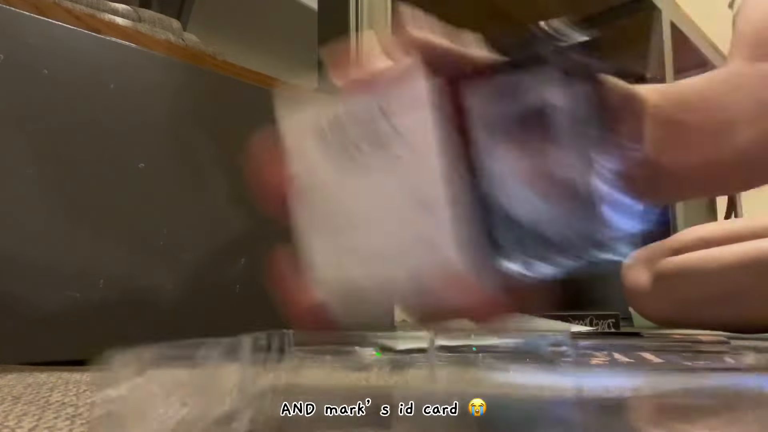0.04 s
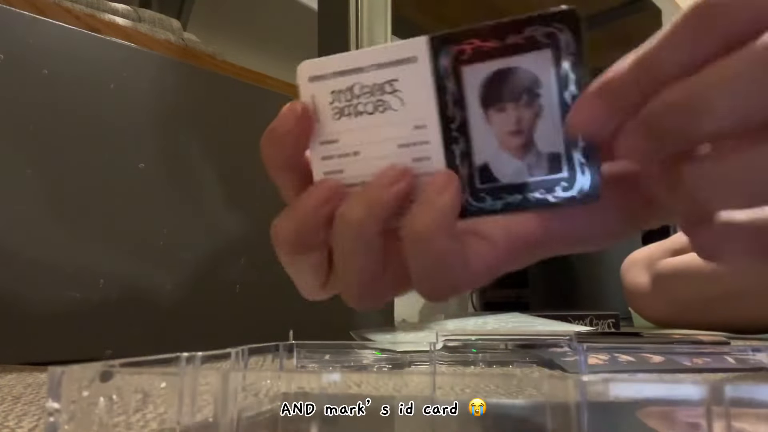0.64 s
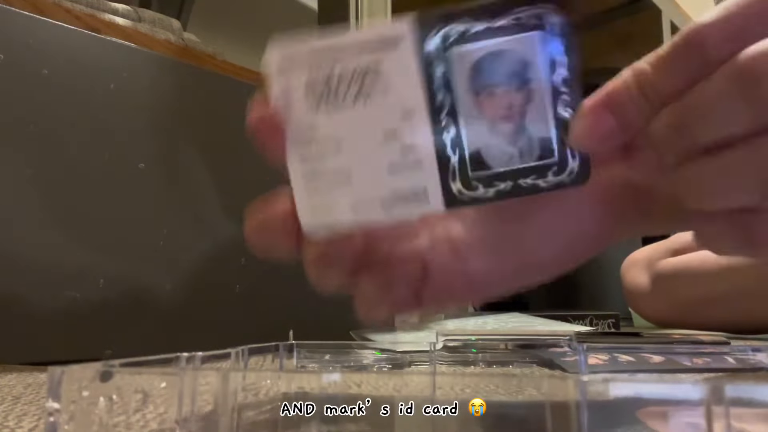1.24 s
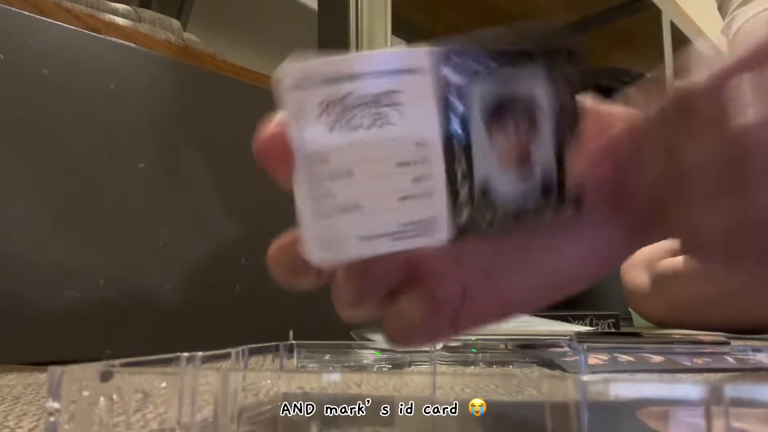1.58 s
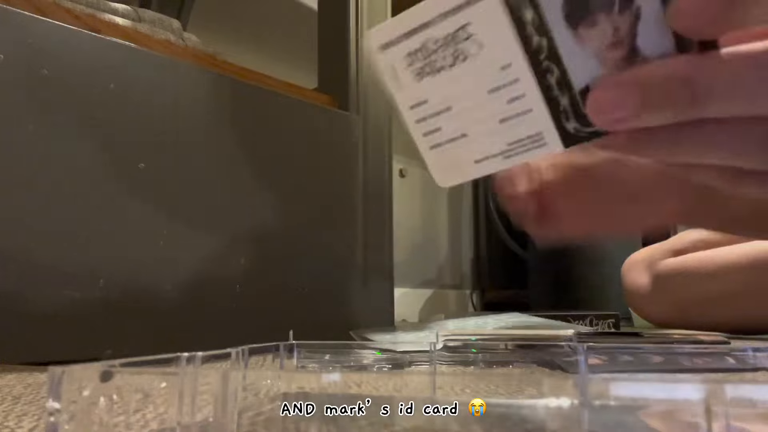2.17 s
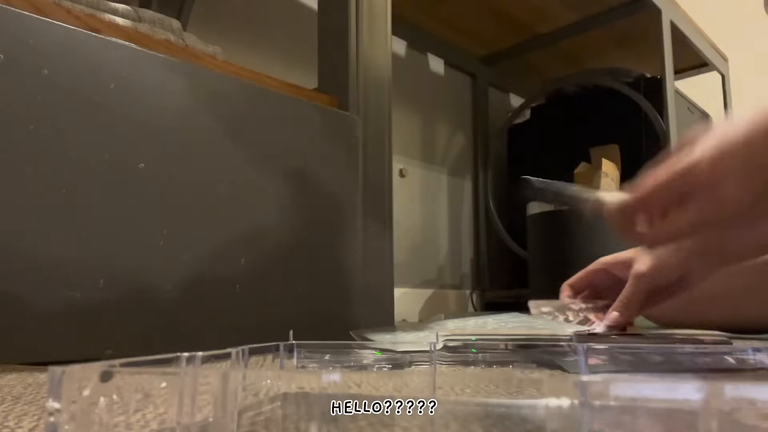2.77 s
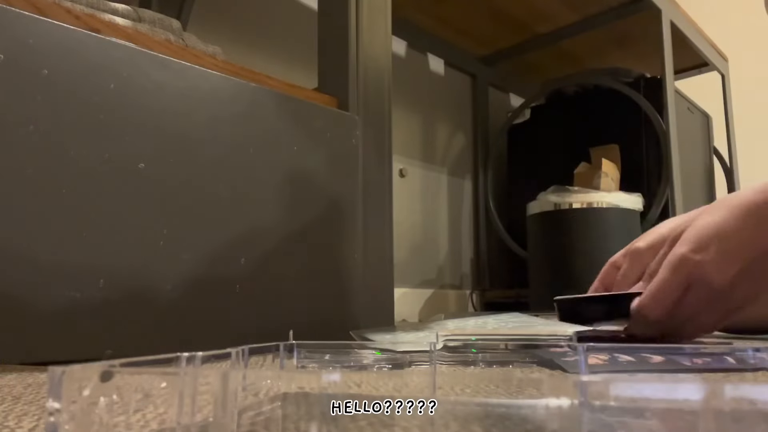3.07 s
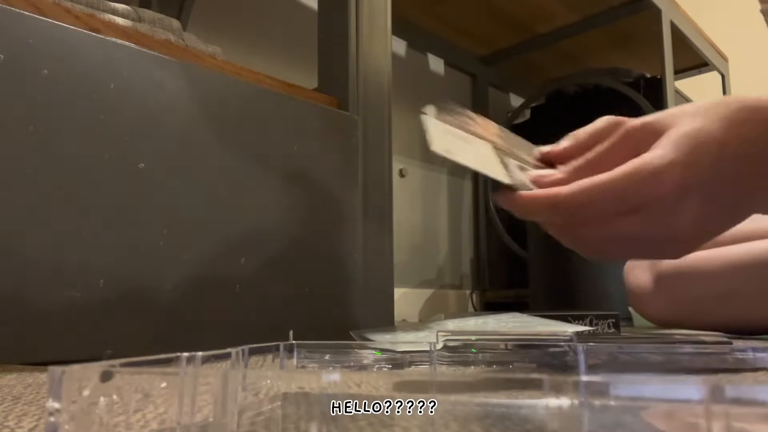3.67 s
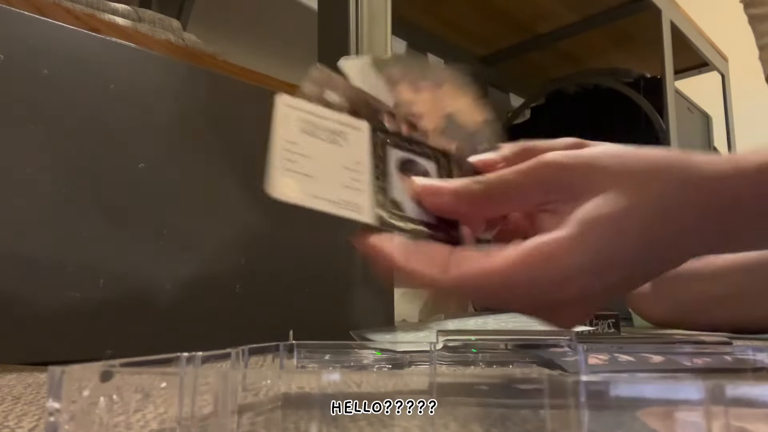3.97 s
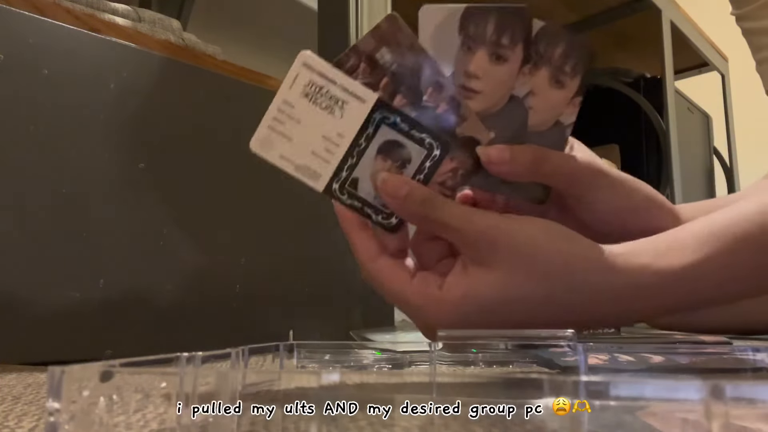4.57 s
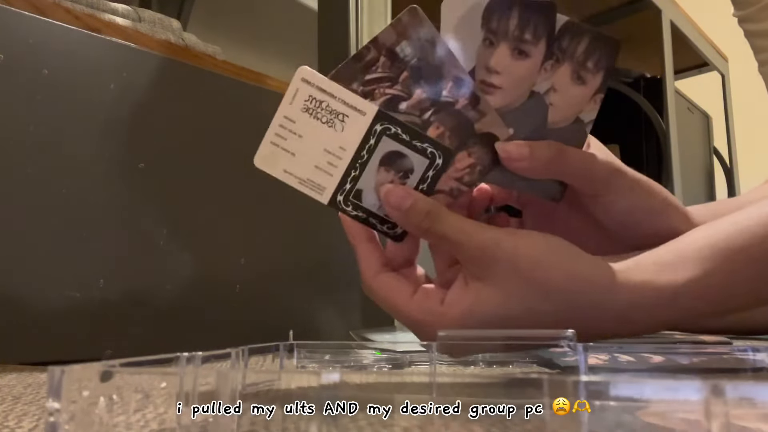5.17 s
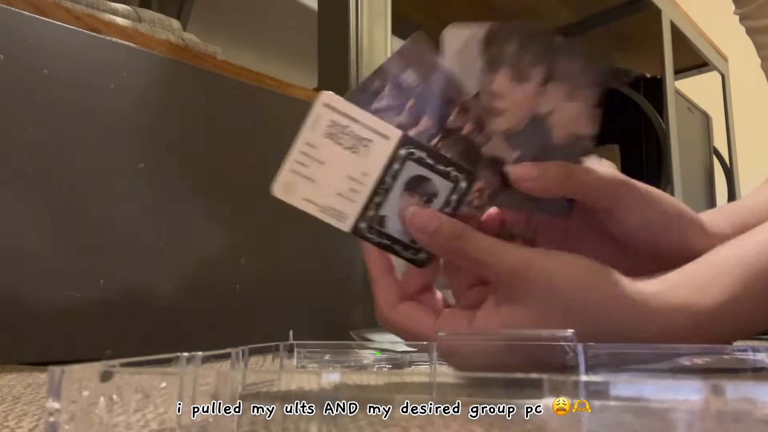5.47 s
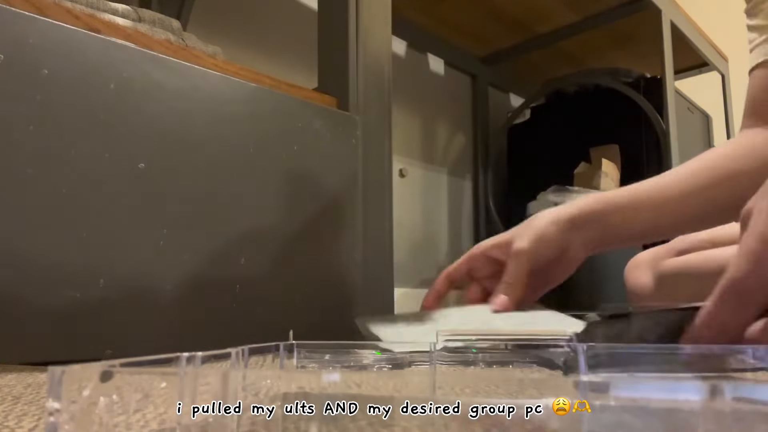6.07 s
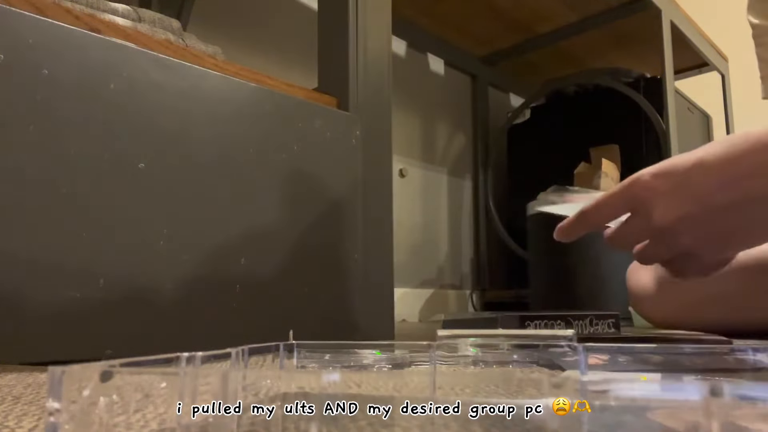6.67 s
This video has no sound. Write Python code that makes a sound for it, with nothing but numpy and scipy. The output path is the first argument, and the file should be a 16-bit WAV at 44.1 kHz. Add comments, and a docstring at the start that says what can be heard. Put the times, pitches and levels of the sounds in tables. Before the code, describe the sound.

In a small, dry room, hands handle stiff cards near the microphone. It opens with a loud rattling scrape and two springy snaps, then a soft bump and a couple of clicks. Quiet rubbing and swishing of card over card follows, dotted with small taps and broken by one sharp snap past the middle. More sliding and light ticks close it, over a faint low hum.

```python
"""A stiff card scrapes and snaps over the fingers and flexes twice, close by in a small carpeted room.
Later, skin and card slide in short hissing strokes with light taps; cards are picked off a pile, fanned
with one sharp snap and put down. Each snap is an impulse that excites the modes of the cards, each flex
a dispersive bending wave; sliding friction gives the hiss and damped resonances give the taps.
An appliance hums behind."""
import sys
import numpy as np
from scipy import signal
from scipy.fft import rfft, irfft, next_fast_len
from scipy.io import wavfile
from scipy.ndimage import uniform_filter1d

SR = 44100
rng = np.random.default_rng(int(sys.argv[2]) if len(sys.argv) > 2 else 0)


def store_wav(level_fs):
    """Save 16-bit WAV to argv[1]."""
    pcm = np.round(np.clip(np.atleast_2d(level_fs), -1, 1) * 32767)
    wavfile.write(sys.argv[1], SR, pcm.T.astype(np.int16))


N = 301644
TIME = np.arange(N) / SR

# stereo width by frequency, the highest treble drawn to the centre: (frequency [Hz], correlation [-1..1])
NEAR_STEREO = [(200, 0.45), (640, 0), (1400, 0.2), (3100, 0.1), (7000, -0.1), (11000, 0), (14000, 0.7)]
# the same, but wider around 3 kHz: (frequency [Hz], correlation [-1..1])
SNAP_STEREO = [(200, 0.4), (700, 0.3), (1500, 0.2), (3000, -0.3), (5000, -0.05), (11000, 0), (14000, 0.7)]


def from_db(db):
    """Amplitude ratio of a level in decibels."""
    return np.exp(np.asarray(db) * np.log(10) / 20)


def unit_rms(x):
    """Normalisation to unit mean power."""
    return x / np.sqrt(np.mean(x ** 2) + 1e-20)


def at_hz(points, hz):
    """Interpolation on a logarithmic frequency axis."""
    f, value = np.transpose(points)
    return np.interp(np.log(np.maximum(hz, 1)), np.log(f), value)


def decay(t, t60):
    """Exponential damping, 60 dB down at t60."""
    return np.exp(-np.log(1000) * t / t60)


def add(out, s, sound):
    """Superposition of a short sound from time s on."""
    start = max(round(s * SR), 0)
    out[:, start:start + sound.shape[-1]] += sound[..., :N - start]


def panned(db):
    """Direction by level difference: a pair of gains, left over right."""
    return from_db(np.array([[db], [-db]]) / 2)


def drift(per_s):
    """Random modulation: linear interpolation between values of unit variance."""
    knots = rng.standard_normal(N // 100)
    return np.interp(TIME * per_s, np.arange(len(knots)), knots)


def low_pass(x, hz, order=1):
    """Butterworth attenuation above a cutoff."""
    return signal.sosfilt(signal.butter(order, min(hz, SR / 2 - 1), fs=SR, output="sos"), x)


def resonate(x, hz, width_hz):
    """Forced response of a damped oscillator with unit peak gain."""
    r = np.exp(-np.pi * width_hz / SR)
    feedback = [1, -2 * r * np.cos(2 * np.pi * hz / SR), r * r]
    return signal.lfilter(np.array([1, 0, -1]) * (1 - r * r) / 2, feedback, x + 1e-18)


def colour(x, spectrum, size=8192):
    """Minimum-phase filtering to a given spectral shape; white noise keeps its power."""
    gain = unit_rms(from_db(at_hz(spectrum, np.fft.rfftfreq(size, 1 / SR))))
    cepstrum = irfft(np.log(gain))
    cepstrum[1:size // 2] *= 2
    cepstrum[size // 2 + 1:] = 0
    response = irfft(np.exp(rfft(cepstrum)))
    return signal.oaconvolve(x, response[None], axes=1)[:, :N]


def cohere(x, coherence):
    """Partial coherence: cross-mixing gives two independent channels a set correlation."""
    size = next_fast_len(N)
    left, right = rfft(x, size)
    angle = np.arcsin(np.clip(at_hz(coherence, np.fft.rfftfreq(size, 1 / SR)), -1, 1)) / 2
    own, other = np.cos(angle), np.sin(angle)
    return irfft([own * left + other * right, own * right + other * left], size)[:, :N]


def noise(spectrum, coherence):
    """Gaussian stereo noise of given spectrum and coherence, at unit rms."""
    return unit_rms(colour(cohere(rng.standard_normal((2, N)), coherence), spectrum))


def appliance(rumble_db=-54, wander_rad=0.25, wander_per_s=5):
    """Phase modulation makes the tones of a hum waver over the low rumble of the room."""
    # tones of the appliance: (frequency [Hz], rms level [dB])
    tones = [(123.0, -52.5), (430.5, -69.5)]
    # room rumble: (frequency [Hz], relative spectral density [dB])
    rumble_spectrum = [(25, -31.5), (45, -26.5), (65, 6), (90, 3.5), (130, -3.5), (200, -3.5), (300, -10),
                       (450, -14.5), (700, -24), (1050, -36.5), (1550, -34), (2100, -47), (3000, -57)]
    # left-right coherence of the rumble: (frequency [Hz], correlation [-1..1])
    rumble_coherence = [(40, 0.97), (130, 0.94), (300, 0.66), (700, 0.18), (2000, .1)]
    hum = np.zeros(N)
    for hz, db in tones:
        phase = 2 * np.pi * hz * TIME + wander_rad * drift(wander_per_s)
        hum += np.sqrt(2) * from_db(db) * np.sin(phase)
    return hum + from_db(rumble_db) * noise(rumble_spectrum, rumble_coherence)


def room(x, bass_t60=0.15, treble_t60=0.056, split_hz=2500, wet_db=-15.5, gap_s=0.00047):
    """Diffuse reflections from floor and furniture; absorption by the carpet takes the treble first."""
    t = np.arange(SR // 2) / SR
    scatter = rng.standard_normal((2, len(t)))
    low = low_pass(scatter, split_hz)
    echoes = (low * decay(t, bass_t60) + (scatter - low) * decay(t, treble_t60)) * (t > gap_s)
    echoes /= np.sqrt(np.sum(echoes ** 2, axis=1, keepdims=True))
    return from_db(wet_db) * signal.oaconvolve(x, echoes, axes=1)[:, :N]


def bump(start_s=0.46, level_db=-35.5, rise_s=0.045):
    """A change of grip is a slow push, so it excites only low, hollow modes."""
    # ringing modes: (frequency [Hz], bandwidth [Hz], relative level [dB], t60 [s])
    modes = [(142, 94, 0.5, 0.65), (377, 260, -2, 0.35), (596, 45, -17, 0.97)]
    out, t = np.zeros((2, N)), np.arange(SR // 2) / SR
    for hz, width, db, t60 in modes:
        band = resonate(rng.standard_normal((2, len(t))), hz, width)
        body = unit_rms(resonate(band, hz, width))
        envelope = decay(t, t60) * (1 - np.exp(-t / rise_s))
        add(out, start_s, from_db(level_db + db) * body * envelope)
    return cohere(out, SNAP_STEREO)


def touches(rise_share=0.01, bright_share=0.085, grain_db=0.5, grains_per_s=500):
    """Soft impacts excite one damped resonance: the harder, the higher, broader and shorter it is."""
    # contacts of hands and cards: (time [s], level [dB], centre frequency [Hz])
    contacts = [(0.019, -33, 395), (0.473, -48.5, 980), (0.494, -37.5, 700), (0.76, -65.5, 1400),
                (1.551, -43, 604), (1.573, -44.5, 456), (2.079, -52.5, 900), (2.383, -45.5, 1360),
                (2.456, -47, 900), (2.592, -45.5, 1060), (4.003, -39.5, 345), (4.176, -50, 362),
                (4.776, -49, 1280), (5.112, -46.5, 374), (5.117, -61, 1473), (5.519, -49, 346),
                (6.097, -46, 474), (6.154, -55, 1510), (6.384, -43, 856), (6.406, -53, 1080),
                (6.448, -47.5, 550), (6.636, -49.5, 880), (6.666, -48.5, 870), (6.677, -47, 630)]
    out, t = np.zeros((2, N)), np.arange(SR // 2) / SR
    for s, db, hz in contacts:
        khz = hz / 1000
        width_hz, t60 = 970 * khz ** 2.1, 0.075 / khz ** 0.93
        envelope = decay(t, t60) * (1 - np.exp(-t / (rise_share * t60)))
        bright = resonate(rng.standard_normal((2, len(t))), hz, width_hz)
        # the first instant of contact is brighter than the ring after it
        body = (resonate(bright, hz, width_hz) + bright_share * bright * decay(t, t60)) * envelope
        add(out, s, from_db(db) * unit_rms(body) * np.sqrt(np.mean(envelope ** 2)))
    tiny_slips = from_db(grain_db * drift(grains_per_s))
    return cohere(out, NEAR_STEREO) * tiny_slips * panned(-0.5)


def drags(width_share=0.2, rise_octaves=0.05, grain_db=1.5, grains_per_s=220):
    """Stick-slip chatter of a fingertip drives one resonance, which rises as the finger tightens."""
    # fingertip drags: (time [s], duration [s], level [dB], centre frequency [Hz])
    fingertips = [(0.406, 0.13, -69, 3715), (0.549, 0.16, -81, 3840), (0.741, 0.16, -82, 3810),
                  (0.835, 0.054, -66, 854), (1.048, 0.056, -70, 1050), (1.188, 0.06, -76, 1735),
                  (1.876, 0.11, -63, 2100), (2.759, 0.063, -55.5, 853), (3.697, 0.037, -56.5, 953),
                  (3.812, 0.11, -61, 962), (4.129, 0.05, -60, 1500), (4.46, 0.035, -61, 3300),
                  (4.514, 0.13, -66, 3260), (5.239, 0.04, -63.5, 1690), (5.816, 0.048, -57.5, 2560),
                  (5.894, 0.07, -62, 10050), (6.3, 0.035, -54, 8700)]
    out = np.zeros((2, N))
    for s, length, db, hz in fingertips:
        along = np.linspace(0, 1, int(length * SR))
        band = unit_rms(low_pass(rng.standard_normal((2, len(along))), width_share * hz / 2, order=2))
        phase = 2 * np.pi * np.cumsum(hz * 2 ** (rise_octaves * (along - .5))) / SR
        chatter = band[0] * np.cos(phase + rng.uniform(0, np.pi, (2, 1))) + band[1] * np.sin(phase)
        add(out, s, from_db(db) * chatter * np.sin(np.pi * along))
    return out * from_db(grain_db * drift(grains_per_s)) * panned(2.5)


def crackle(per_s, low_hz, high_hz, bands=9, spread_db=5, ring_cycles=7):
    """Shot noise of tiny slips, many weak and a few strong, each ringing briefly; unit rms."""
    out, per_band = np.zeros((2, N)), int(per_s * N / SR / bands)
    for hz in np.geomspace(low_hz, high_hz, bands):
        slips = np.zeros((2, N))
        sizes = from_db(spread_db * np.minimum(rng.exponential(1, per_band), 2))
        slips[:, rng.integers(0, N, per_band)] = sizes * rng.uniform(-0.76, 1, (2, per_band))
        out += unit_rms(resonate(slips, hz, np.log(1000) / np.pi * hz / ring_cycles))
    return unit_rms(out)


def moving_patch(hiss, low_hz=2494, high_hz=14700, bands=12, width_share=0.27, swing_db=5.5, per_s=18):
    """A moving contact patch redistributes power among the bands of a hiss; the rms stays at 1."""
    gains = from_db([swing_db * drift(per_s) for _ in range(bands)])
    gains /= np.sqrt(np.mean(gains ** 2, axis=0))
    centres = np.geomspace(low_hz, high_hz, bands)
    mix = sum(gain * resonate(hiss, hz, width_share * hz) for gain, hz in zip(gains, centres))
    return mix / np.sqrt(uniform_filter1d(np.mean(mix ** 2, axis=0), size=1024) + 1e-20)


def friction_gains(attack_s=0.055, slowing_db=5.5, release_t60=0.1):
    """Incoherent sources add in power: creep plus strokes give the gains of hiss and rub."""
    # fingers creeping on the cards: (time [s], hiss level [dB], rub level [dB])
    creep = [(0.25, -67, -70), (0.319, -85.5, -81.5), (1.721, -85.5, -78), (1.8, -71, -67), (6.8, -71, -78)]
    # skin and card sliding over card: (time [s], duration [s], hiss level [dB], rub over hiss [dB])
    strokes = [(0.388, 0.077, -62.5, -0.5), (0.437, 0.13, -59, -8.5), (0.546, 0.13, -68.5, -24),
               (1.777, 0.17, -56, -2), (1.853, 0.13, -49.5, 1), (2.0, 0.13, -65, -15),
               (2.143, 0.22, -50, -3.5), (2.32, 0.21, -51, -3.5), (2.5, 0.48, -60, -2),
               (2.698, 0.07, -54, -13), (2.748, 0.14, -46, -4.5), (2.893, 0.12, -49.5, -2.5),
               (3.003, 0.16, -47, -5), (3.107, 0.13, -49, -3.5), (3.291, 0.29, -55, -5),
               (3.437, 0.13, -44.5, -9), (3.562, 0.17, -57, -17), (3.663, 0.13, -51.5, -1.5),
               (3.757, 0.12, -45.5, -7), (3.853, 0.093, -53, -4), (3.956, 0.091, -45, -3.5),
               (4.096, 0.17, -54.5, -2.5), (4.262, 0.96, -58.5, -11.5), (4.438, 0.16, -53.5, -7),
               (4.527, 0.31, -57, -5.5), (4.709, 0.3, -56, -6), (4.883, 0.055, -46.5, -5.5),
               (5.044, 0.71, -59, -2.5), (5.078, 0.046, -44.5, -47), (5.39, 0.1, -49.5, -12.5),
               (5.486, 0.21, -53.5, -4.5), (5.673, 0.2, -52, -11.5), (5.885, 0.084, -53, -10.5),
               (6.027, 0.2, -59, -2.5), (6.261, 0.088, -52, -6), (6.34, 0.1, -50.5, 1),
               (6.415, 0.13, -55, -8.5), (6.53, 0.19, -51.5, -8.5), (6.694, 0.61, -55.5, -7)]
    s, hiss_db, rub_db = np.transpose(creep)
    power = from_db([np.interp(TIME, s, hiss_db), np.interp(TIME, s, rub_db)]) ** 2
    t = np.arange(SR) / SR
    for start, length, db, coarse_db in strokes:
        speeding = np.minimum(t / attack_s, 1)
        slowing = from_db(-slowing_db * np.minimum(t / length, 1))
        release = decay(np.maximum(t - length, 0), release_t60)
        add(power, start, (from_db([[db], [db + coarse_db]]) * speeding * slowing * release) ** 2)
    return np.sqrt(power)


def sliding(pressure_db=1.3, hiss_grain_db=1.0, rub_grain_db=1.5, ring_db=-2.0, grip_db=4.5):
    """Sliding friction radiates a smooth hiss and a coarser rub; both tremble as the surfaces catch."""
    # fine friction: (frequency [Hz], relative spectral density [dB])
    hiss_spectrum = [(900, -19), (2500, -5), (4000, -0.5), (7000, 0.5), (11000, 0.5), (13000, -2.5),
                     (15500, -2)]
    # coarse friction: (frequency [Hz], relative spectral density [dB])
    rub_spectrum = [(250, 2), (500, 6.5), (900, -3.5), (2000, -1), (3500, -6), (6000, -22), (12000, -28.5)]
    # modes driven by the rub: (frequency [Hz], bandwidth [Hz], relative gain [dB])
    modes = [(832, 130, 5), (1243, 200, 3.5), (1675, 440, -1), (2050, 64, -3.5), (2598, 150, -6.5),
             (3164, 140, -1), (3400, 260, -5), (3840, 250, 2.5), (5570, 79, -2.5)]
    fine, coarse = friction_gains() * from_db(pressure_db * drift(per_s=45))
    grain = drift(per_s=160)
    smooth = moving_patch(noise(hiss_spectrum, NEAR_STEREO))
    slips = from_db(-11) * crackle(per_s=200, low_hz=1500, high_hz=11000)
    hiss = fine * (from_db(hiss_grain_db * grain) * smooth + slips)
    rub = coarse * noise(rub_spectrum, NEAR_STEREO) * from_db(rub_grain_db * grain)
    # shifting fingers damp and free one mode after another
    ringing = sum(from_db(db + ring_db + grip_db * drift(per_s=24)) * resonate(rub, hz, width)
                  for hz, width, db in modes)
    edge_catches = coarse * from_db(-12) * crackle(per_s=130, low_hz=920, high_hz=4500)
    return (hiss + from_db(-5) * rub + ringing + edge_catches) * panned(0.5)


def flexes(sweep_cycles=1.664, rise_s=0.0005):
    """Dispersion: bending waves run faster at high frequency, so each flex is a falling chirp."""
    # the card springing back: (time [s], level [dB], starting pitch [Hz], t60 [s], left over right [dB])
    bends = [(0.1363, -16.5, 1950, 0.034, 7), (0.142, -31, 328, 0.045, -1), (0.2054, -14, 1150, 0.0067, 1),
             (0.211, -17.5, 383, 0.029, 2)]
    out, t = np.zeros((2, N)), np.arange(SR // 10) / SR
    for s, db, start_hz, t60, pan_db in bends:
        phase = 2 * np.pi * sweep_cycles * np.log1p(t * start_hz / sweep_cycles)
        # the closing fingers damp the card harder and harder
        swing = decay(t * t / t60, t60) * (1 - np.exp(-t / rise_s))
        add(out, s, np.sin(phase) * swing * from_db(db) * panned(pan_db))
    return out


def scrape(from_s=0.029, to_s=0.072, count=9, rattle_t60=0.12, ring_hz=2900):
    """Stick-slip of a dragged edge, as rows of small snaps that grow stronger and duller."""
    along = np.linspace(0, 1, count)
    lateness, weakness = rng.uniform(-1, 1, (count, 2)).T
    s = from_s + (to_s - from_s) * (along + lateness / count / 10)
    db = -31 + 3.5 * along - weakness
    treble_db = -4.5 - 8.5 * along
    return [(*slip, rattle_t60, ring_hz, 0) for slip in zip(s, db, treble_db)]


def free_ring(hz, t, t60=0.037, right_lag_s=0.000099):
    """Free vibration of the mode that the grip leaves loose; it reaches the left channel first."""
    since = np.maximum(t - np.array([[0], [right_lag_s]]), 0)
    return np.sin(2 * np.pi * hz * since) * decay(since, t60)


def snaps(rows, modes, modes_db, broad_db, free_db, crack_t60, rattle_db, spike, split_hz=3000):
    """Impulse excitation: a released edge sends a spike, a crack and a rattle through the card modes."""
    # broadband part of a snap: (frequency [Hz], relative spectral density [dB])
    spectrum = [(80, -36), (200, -7.5), (450, -5.5), (800, -10), (1500, -0.5), (3000, -5), (5000, -3),
                (8000, -3.5), (11000, -5.5), (15500, -15.5)]
    bursts, free, t = np.zeros((2, N)), np.zeros((2, N)), np.arange(SR // 10) / SR
    for s, db, treble_db, rattle_t60, free_hz, pan_db in rows:
        envelope = decay(t, crack_t60) + from_db(rattle_db) * decay(t, rattle_t60)
        burst = rng.standard_normal((2, len(t))) * envelope
        # the wave front arrives on the left first, and the card's two faces push in opposite ways
        burst[0, 0] += spike
        burst[1, 2] -= spike
        # two shelving stages: a soft contact loses treble
        for _ in range(2):
            low = low_pass(burst, split_hz)
            burst = low + from_db(treble_db) * (burst - low)
        # partly even out the strength of the first milliseconds
        burst /= np.mean(burst[:, :SR // 300] ** 2, axis=1, keepdims=True) ** (1 / 4)
        add(bursts, s, burst * from_db(db) * panned(pan_db))
        add(free, s, free_ring(free_hz, t) * from_db(db + free_db) * panned(pan_db))
    bursts = cohere(bursts, SNAP_STEREO)
    ringing = sum((-1) ** k * from_db(db) * resonate(bursts, hz, width)
                  for k, (hz, width, db) in enumerate(modes))
    return from_db(broad_db) * colour(bursts, spectrum) + from_db(modes_db) * ringing + free


def scene(edge_until_s=0.1, bundle_from_s=2.3):
    """Superposition: a dragged edge, one card and then a bundle snap amid handling sounds and hum."""
    # card edges snapping free: (time [s], level [dB], treble gain per stage [dB], rattle t60 [s],
    # free mode [Hz], left over right [dB])
    releases = [(0.036, -11.5, -5.5, 0.019, 2910, 2), (0.047, -19, -3.5, 0.027, 2870, 1),
                (0.053, -15, -5, 0.077, 2670, 5), (0.0667, -17, 12, 0.0093, 6100, 0),
                (0.0691, -16, -4, 0.015, 797, 5), (0.072, -15.5, -5, 0.01, 5160, 3),
                (0.1364, -14, -12.5, 0.015, 1483, -0.5), (0.144, -16.5, -3, 0.014, 603, 5.5),
                (0.146, -20.5, 3.5, 0.01, 3600, -4.5), (0.204, -13, -13, 0.016, 796, 6),
                (0.209, -18.5, 6.5, 0.0081, 6660, 3), (0.31, -57.5, -2.5, 0.032, 3560, -2),
                (0.355, -61, -4, 0.023, 3470, -1.5), (0.423, -51.5, 0, 0.038, 3600, 2),
                (0.457, -51, -2, 0.019, 3700, 2), (0.499, -41, -17, 0.025, 900, 2),
                (0.5154, -52, 5, 0.01, 3700, 4), (0.845, -59, -4, 0.088, 3850, 0.5),
                (1.548, -22.5, -12.5, 0.017, 2400, 2.5), (1.551, -29.5, -22.5, 0.045, 2730, 0.5),
                (1.5709, -23, -8.5, 0.034, 2900, 0), (2.08, -50, -4, 0.029, 3400, 6),
                (2.117, -58, 0, 0.047, 3430, 7), (2.382, -39.5, -19, 0.035, 1320, 0),
                (2.452, -37.5, -20, 0.036, 1910, 0.5), (2.482, -35.5, -22, 0.021, 2200, 0),
                (2.921, -43, -18, 0.018, 1490, 3), (2.952, -39, -16, 0.029, 3300, 1),
                (3.408, -37, -11, 0.038, 3200, 0), (3.438, -41.5, -22, 0.018, 680, 0),
                (3.976, -48, -16, 0.02, 1540, 0), (4.002, -7.5, -2, 0.028, 1446, 2.5),
                (4.009, -18.5, -15, 0.011, 4540, 7.5), (4.411, -52, 5, 0.018, 7040, 2),
                (4.778, -48, -12, 0.02, 1580, 0), (5.25, -43, -4, 0.025, 3630, 2),
                (5.472, -45, -5, 0.02, 3900, -2.5), (6.084, -41.5, -4.5, 0.022, 2900, -1),
                (6.099, -38.5, -0.5, 0.028, 1070, 6), (6.328, -49, 2, 0.006, 3020, -4),
                (6.38, -33.5, -18, 0.051, 890, -3), (6.394, -40, -21, 0.032, 3020, 8),
                (6.448, -43, -4, 0.023, 1210, 3), (6.665, -39.5, -1, 0.097, 1900, 0)]
    # modes of the dragged edge: (frequency [Hz], bandwidth [Hz], relative gain [dB])
    edge_modes = [(253, 77, 0), (870, 80, -5), (1410, 360, -12), (2920, 100, 2.5), (3280, 260, 1.5),
                  (4500, 340, 6.5), (5080, 120, 4.5), (6200, 120, 7), (7960, 78, -9), (9900, 160, -3.5)]
    # modes of the single card: (frequency [Hz], bandwidth [Hz], relative gain [dB])
    card_modes = [(404, 48, -5), (737, 65, 6.5), (1410, 110, -3.5), (1891, 67, -1), (2220, 82, -9.5),
                  (3020, 90, 6.5), (3710, 160, 2.5), (4280, 88, -2), (4930, 160, -3), (6630, 125, -1),
                  (8530, 190, -9), (9600, 120, -6.5)]
    # modes of the bundle: (frequency [Hz], bandwidth [Hz], relative gain [dB])
    bundle_modes = [(250, 125, -11), (445, 36, -5.5), (760, 110, -12.5), (1450, 114, -1), (1914, 95, -7),
                    (2474, 93, -1.5), (2740, 60, -4), (4050, 480, -3.5), (4390, 60, 3.5), (5050, 120, 1),
                    (5390, 110, -5.5), (6230, 300, -0.5), (6620, 180, -7), (8260, 330, -3), (8450, 170, -7),
                    (10060, 260, -8)]
    edge = snaps(scrape() + [row for row in releases if row[0] < edge_until_s], edge_modes,
                 modes_db=4, broad_db=-6, free_db=-7, crack_t60=0.002, rattle_db=2, spike=2)
    card = snaps([row for row in releases if edge_until_s <= row[0] < bundle_from_s], card_modes,
                 modes_db=-1.5, broad_db=-4, free_db=-10, crack_t60=0.0018, rattle_db=1.5, spike=3.2)
    bundle = snaps([row for row in releases if row[0] >= bundle_from_s], bundle_modes,
                   modes_db=6.5, broad_db=-8, free_db=-10, crack_t60=0.009, rattle_db=0.5, spike=7)
    bends = flexes()
    echoes = room(edge + card + from_db(-2) * bundle + from_db(-4) * bends)
    return edge + card + bundle + bends + echoes + touches() + drags() + bump() + sliding() + appliance()


def record(dry, low_cut_hz=52, high_cut_hz=15800, ceiling=0.84):
    """Band limiting and saturation: deep bass is dropped, peaks rounded, the highest treble cut off."""
    thin = signal.sosfilt(signal.butter(4, low_cut_hz, "high", fs=SR, output="sos"), dry)
    rounded = ceiling * np.tanh(thin / ceiling)
    return signal.sosfilt(signal.ellip(10, .1, 90, high_cut_hz, fs=SR, output="sos"), rounded)


dry = scene()
out = record(dry)
store_wav(out)
```